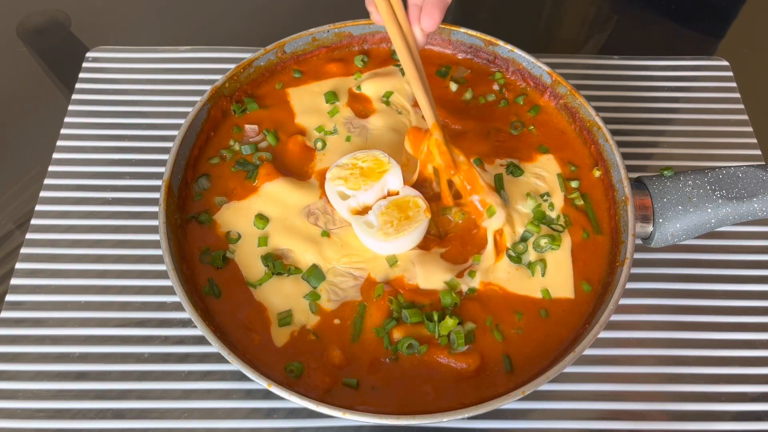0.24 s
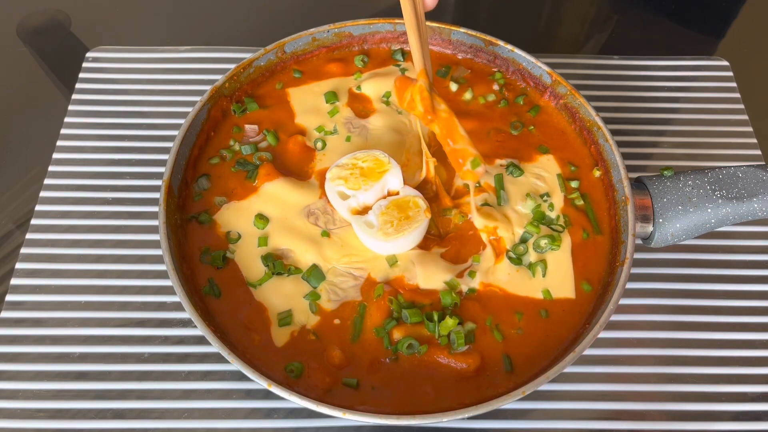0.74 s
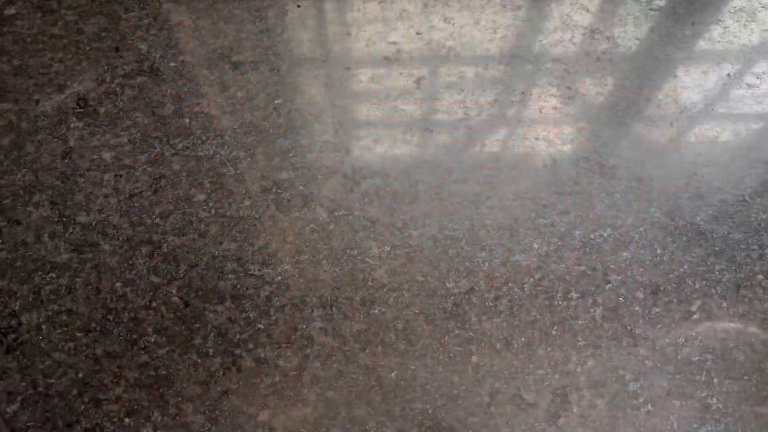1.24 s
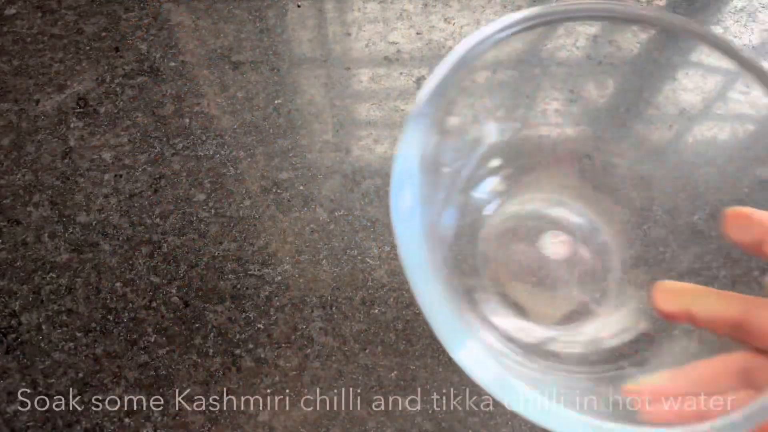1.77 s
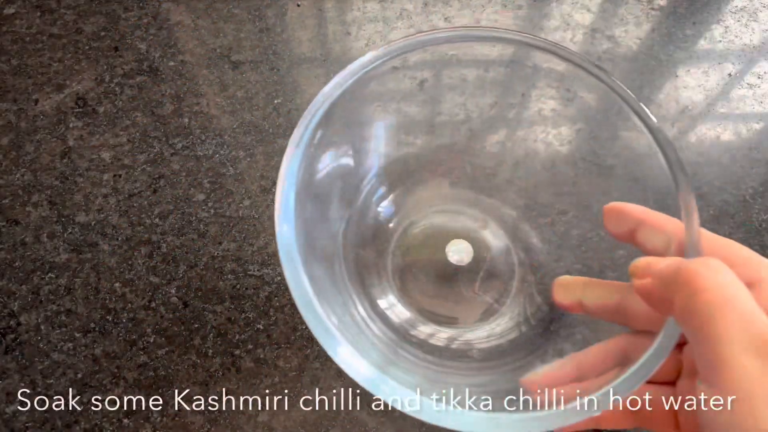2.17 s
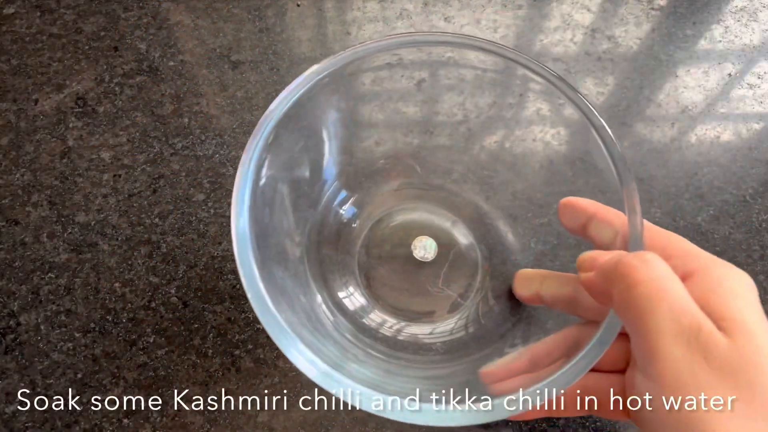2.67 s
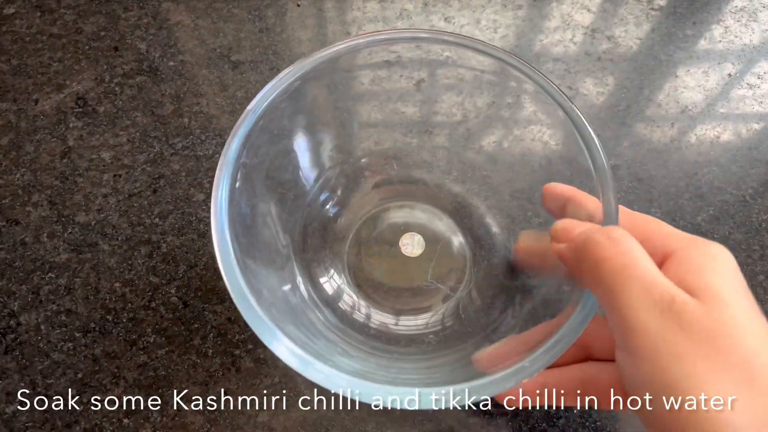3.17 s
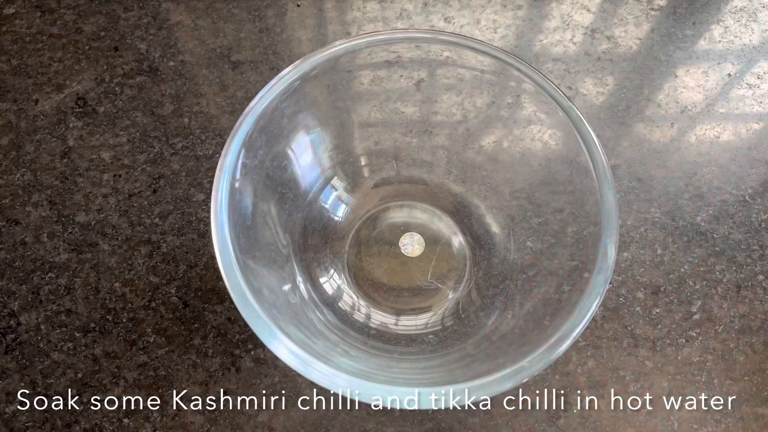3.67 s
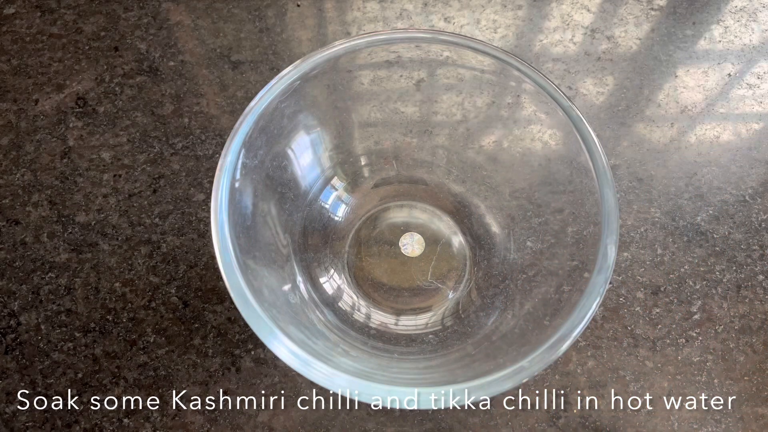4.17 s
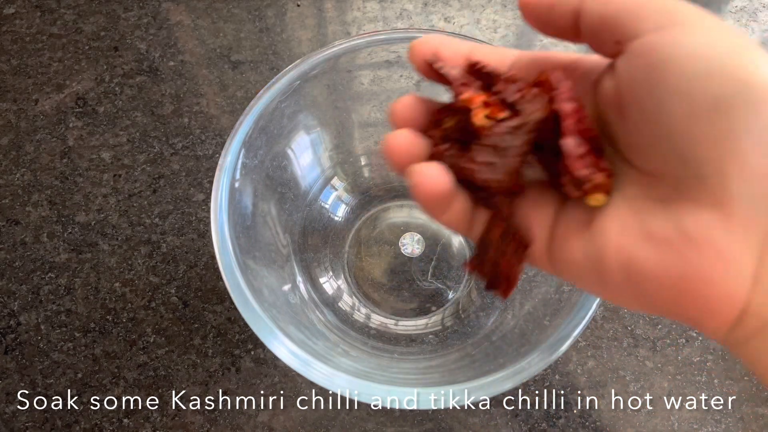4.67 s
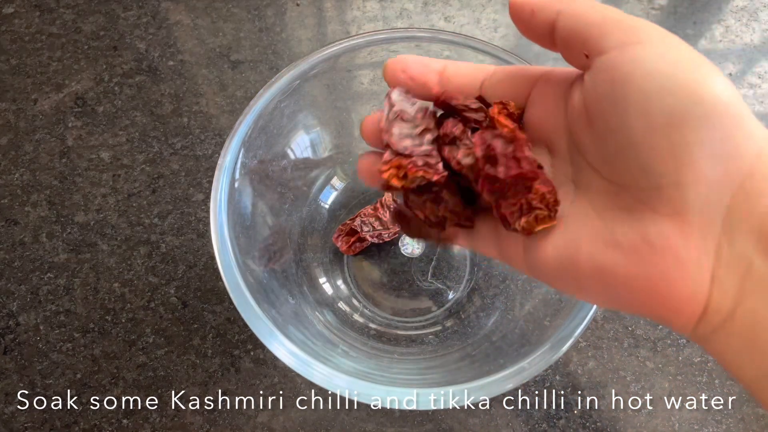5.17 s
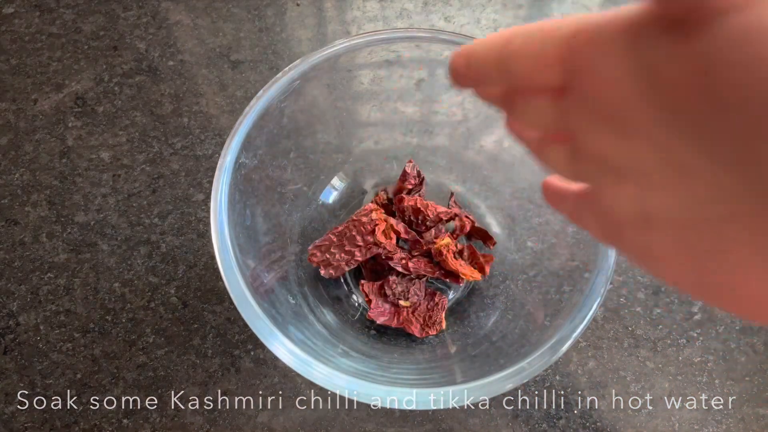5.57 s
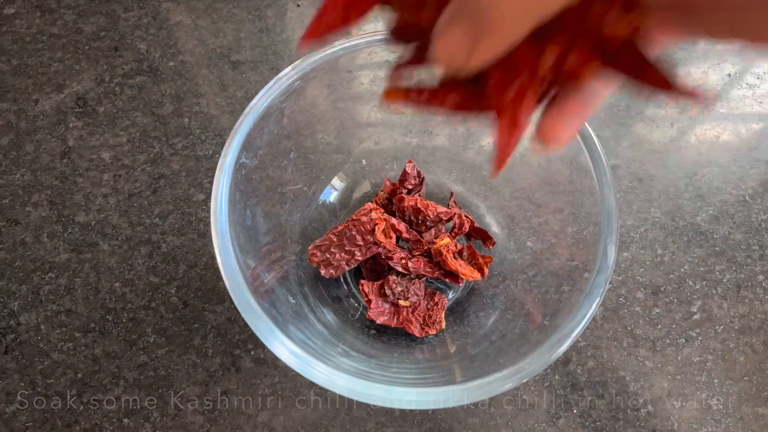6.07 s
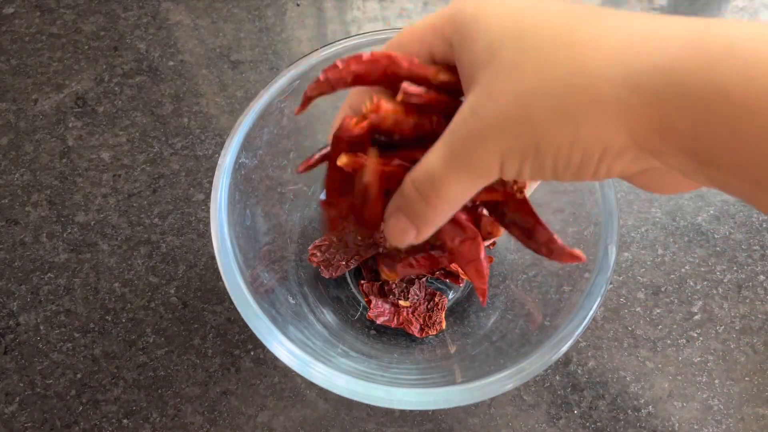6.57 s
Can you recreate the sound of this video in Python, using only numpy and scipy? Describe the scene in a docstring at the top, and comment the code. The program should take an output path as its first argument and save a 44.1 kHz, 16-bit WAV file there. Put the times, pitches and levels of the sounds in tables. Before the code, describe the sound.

Close stereo sound in a small, hard kitchen. A pan simmers faintly with one soft sauce pop, cutting to quiet counter air. A glass bowl lands on stone with a hard knock and duller settling bumps. Dry chillies rustle in a palm, tick singly into the glass, then tumble in a bright crackling clatter. A low hum swells and fades while a second handful crackles in at the end.

```python
"""A small hard kitchen: by the stove a pan simmers faintly, then by the stone counter a glass bowl is set down.
The bowl is struck modes, a knock and grit. Dried chillies rustle in a hand as clouds of tiny snaps,
tick into the bowl as hollow shells with cracking skins, then tumble in; a second handful crackles at the end.
Something knocks further off, a low two-tone hum swells and fades, and thin whines come and go.
Two close microphone ports hear it all, over coloured noise for the air."""
import sys
import numpy as np
from scipy import signal
from scipy.fft import rfft, irfft, next_fast_len
from scipy.io import wavfile
from scipy.ndimage import map_coordinates

SR = 44100
rng = np.random.default_rng(int(sys.argv[2]) if len(sys.argv) > 2 else 0)


def bounce(signal):
    """Save signal as a 16-bit WAV file at the path given by the first command-line argument."""
    frames = np.transpose(np.atleast_2d(signal))
    limited = np.clip(frames, -1, 1)
    pcm = np.round(limited * 32767).astype(np.int16)
    wavfile.write(sys.argv[1], SR, pcm)


N = 300321
TIME = np.arange(N) / SR
AGE = TIME[:SR // 2]  # seconds since a blow
TOP_HZ = 16100  # upper band limit of the sound

# brief dips of the level; the first ends the stove's air, the last lets the hum in: time_s, half_width_s
LEVEL_DIPS = [(1.082, 0.031), (3.437, 0.019), (5.773, 0.0062)]


def amp(db):
    """Decibels to gain."""
    return 10 ** (np.asarray(db) / 20)


def unit(x):
    """Scale to rms 1."""
    return x / np.sqrt(np.mean(x ** 2) + 1e-20)


def unit_attack(x, size=130):
    """Scale a blow so that its first milliseconds have rms 1."""
    return x / np.sqrt(np.mean(x[..., :size] ** 2) + 1e-20)


def along(points, hz):
    """Read (Hz, value) points on a log frequency axis."""
    point_hz, value = np.transpose(points)
    return np.interp(np.log(hz + 1), np.log(point_hz + 1), value)


def fade(t60, size):
    """Exponential decay over size samples, 60 dB in t60 seconds."""
    return np.exp(-np.log(1000) * AGE[:size] / t60)


def wobble(rate):
    """A smooth random curve, rate knots a second."""
    knots = rng.standard_normal(int(N * rate / SR) + 4)
    return map_coordinates(knots, [TIME * rate])


def add(track, s, sound):
    """Mix a sound in at time s, cut off at the track's end."""
    part = track[:, round(s * SR):][:, :sound.shape[-1]]
    part += sound[..., :part.shape[-1]]


SWELL_DB = 20  # rise and fall over a movement's length
RISE_SHARE = 0.48  # part of that length spent rising


def swells(rows):
    """Gain of movements that each rise to their loudest moment and fall again, straight in dB."""
    power = 0
    for s, db, length in rows:
        before = (s - TIME) / RISE_SHARE
        after = (TIME - s) / (1 - RISE_SHARE)
        away = np.maximum(before, after) / length
        power = power + amp(db - SWELL_DB * away) ** 2
    return np.sqrt(power)


def hump(hz, db_per_octave):
    """(Hz, dB) points of one broad resonance, falling off evenly either side of its pitch."""
    return [(hz * 2. ** octave, -db_per_octave * abs(octave)) for octave in range(-4, 5)]


def colour(pair, spectrum, alike):
    """Give two unrelated signals a causal colour and blend them into left and right."""
    n = pair.shape[-1]
    m = 2 * next_fast_len(n // 2 + 2048)
    hz = np.fft.rfftfreq(m, 1 / SR)
    # folding the cepstrum onto positive time gives the minimum-phase response
    cepstrum = irfft(np.log(amp(along(spectrum, hz))))
    response = np.exp(rfft(2 * cepstrum[:m // 2], m) - cepstrum[0])
    # the mid-to-side blend sets the likeness at each frequency
    turn = np.arccos(np.clip(along(alike, hz), -1, 1)) / 2
    blend = [np.cos(turn), np.sin(turn)]
    mid, side = irfft(rfft(pair, m) * response * blend, m)[:, :n]
    return np.array([mid + side, mid - side])


def burst(spectrum, alike, t60, rise, size=4096):
    """A short crack: decaying noise with a soft onset, coloured."""
    envelope = fade(t60, size) * (1 - np.exp(-AGE[:size] / rise))
    noise = rng.standard_normal((2, size)) * envelope
    return unit_attack(colour(noise, spectrum, alike))


def ring(modes, spread, rise=0.00031, size=len(AGE)):
    """Decaying modes struck at new strengths; the lowest are closest in phase at the two ports."""
    t = AGE[:size]
    waves = 0
    for hz, db, t60 in modes:
        strength = amp(db + rng.normal(0, 1.66))
        phase = spread * min(hz / 800, 1) * rng.normal(size=(2, 1))
        waves = waves + strength * fade(t60, size) * np.sin(2 * np.pi * hz * t + phase)
    return waves * (1 - np.exp(-(t / rise) ** 2))


def paired(modes, split_hz, twin_db=-6):
    """A nearly round bowl has a weaker twin just above each mode, so its ring beats."""
    twins = [(hz + split_hz * (.5 + rng.random()), db + twin_db, t60) for hz, db, t60 in modes]
    return list(modes) + twins


# likeness of left and right in the open air: pitch_hz, likeness (1 same, 0 unrelated, -1 opposite)
AIR_LIKENESS = [(60, 0.95), (180, 0.95), (550, 0.04), (1650, -0.13), (4970, 0.2), (15000, 0.28)]
# how long the kitchen rings: pitch_hz, t60_s
ROOM_DECAY = [(150, 0.31), (700, 0.39), (2000, 0.4), (5000, 0.32), (13000, 0.19)]
# tone of the kitchen's reverberation: pitch_hz, level_db
ROOM_TONE = [(90, 2.5), (280, 7.5), (600, 0.5), (12000, -4.5), (16000, -8.5)]


def room(x, rise=0.00054):
    """The kitchen's diffuse answer: noise that dies away band by band, scaled to unit energy on the left."""
    hz, t, bands = signal.stft(rng.standard_normal((2, SR // 2)), SR, nperseg=256)
    decay = amp(-60 * t / along(ROOM_DECAY, hz)[:, None])
    tail = signal.istft(bands * decay, SR, nperseg=256)[1][:, :len(AGE)]
    tail = colour(tail * (1 - np.exp(-AGE / rise)), ROOM_TONE, AIR_LIKENESS)
    return signal.fftconvolve(x, tail / np.linalg.norm(tail[0]), axes=1)[:, :N]


# rumble by the stove: pitch_hz, level_db
STOVE_RUMBLE = [(20, -23), (45, -1.5), (110, -3.5), (170, -12.5), (265, -7.5), (350, -17.5), (2100, -29),
                (5200, -54.5), (9000, -80)]
# rumble of the air by the counter, with a little hiss around 12.5 kHz: pitch_hz, level_db
COUNTER_RUMBLE = [(22, -25.5), (62, 0), (133, -8), (220, -6.5), (320, -16.5), (1200, -25.5), (1700, -33.5),
                  (4500, -49.5), (8000, -67), (12500, -58), (16000, -80)]
# hiss of the pan: pitch_hz, level_db
SIZZLE_TONE = [(2000, -5.5), (4400, 5), (4720, -3), (4880, 8), (5400, -5.5), (15000, -18.5)]
# a soft brushing hiss: loudest_s, level_db, length_s
BRUSH_MOVES = [(1.31, -69.5, 0.3)]
# bright, brittle noise of the brush, the grit and the pods' dry skins: pitch_hz, level_db
BRITTLE_TONE = [(1200, -33), (3000, -17.5), (6000, -9), (9500, -8.5), (12000, -4), (13700, -11.5),
                (16000, -30)]
SIZZLE_DB, SIZZLE_QUIETS_S, SIZZLE_DROP_DB = -64.5, .43, 14  # the pan hisses, then quietens


def rush(spectrum):
    """Steady coloured noise of rms 1, as from moving air."""
    return unit(colour(rng.standard_normal((2, N)), spectrum, AIR_LIKENESS))


def air():
    """Noise rumble and sizzle by the stove give way to the air by the counter, where something brushes past."""
    by_stove = TIME < LEVEL_DIPS[0][0]
    rumble = amp(-47.5) * np.where(by_stove, rush(STOVE_RUMBLE), rush(COUNTER_RUMBLE))
    quietened = np.clip((TIME - SIZZLE_QUIETS_S) / 0.094 + .5, 0, 1)
    sizzle = by_stove * amp(SIZZLE_DB - SIZZLE_DROP_DB * quietened) * rush(SIZZLE_TONE)
    brush = swells(BRUSH_MOVES) * rush(BRITTLE_TONE)
    return rumble + sizzle + brush


# thin, faint whines in the background: start_s, end_s, pitch_hz, level_db
WHINE_TONES = [(0, 1.08, 738, -66.5), (0, 1.08, 2213, -74.5), (1.103, 1.72, 3880, -82),
               (2.12, 3.447, 2536, -83), (3.36, 3.453, 3080, -71), (3.365, 3.433, 3510, -74)]


def whines():
    """Narrow tones, unsteady in pitch and level, that come and go."""
    out = np.zeros((2, N))
    for start, end, hz, db in WHINE_TONES:
        gate = np.clip(np.minimum(TIME - start, end - TIME) / 0.037, 0, 1)
        phase = 2 * np.pi * np.cumsum(hz * (1 + 0.0063 * wobble(90))) / SR
        level = amp(db + 2.5 * wobble(25))
        out += level * gate * np.sin(phase + rng.normal(size=(2, 1)))
    return out


# thick sauce pops in the pan: start_s, level_db, pitch_hz
SAUCE_POPS = [(.845, -52, 1130), (.927, -69, 4200)]


def plops():
    """Bubbles burst softly in the simmering pan, each a noise crack around its own pitch."""
    out = np.zeros((2, N))
    for s, db, hz in SAUCE_POPS:
        pop = burst(hump(hz, db_per_octave=21), AIR_LIKENESS, t60=0.04, rise=0.00092)
        add(out, s, amp(db) * pop)
    return out


# the bowl meets the counter: start_s, level_db, contact_cutoff_hz, glass_ring_db, room_db
BOWL_CONTACTS = [(2.8652, -16, 6900, -47.5, -10), (3.017, -32.5, 1000, -53, -5),
                 (3.0226, -18.5, 613, -51.5, -17), (3.039, -15.5, 243, -73, -23),
                 (3.128, -46.5, 905, -53.5, -4)]
# noise of bowl on stone: pitch_hz, level_db
STONE_KNOCK = [(50, -45), (130, -12.5), (300, -0.5), (550, -1), (900, 3), (1600, -4), (2700, -9.5),
               (3700, -23.5), (8500, -54)]
# the bowl on its base: pitch_hz, level_db, t60_s
BOWL_BODY = [(178.4, -22.5, 0.22), (250, -16, 0.22), (377.5, -18, 0.17), (788, -13, .13), (869, -7, 0.13),
             (987, -15, 0.13), (1230, -16, 0.15), (2455, -21, 0.11)]
# thick glass wall: pitch_hz, level_db, t60_s
GLASS_WALL = [(8400, -14, 0.14), (10555, -3, 0.17), (12430, -13, 0.26), (14700, -27, .3)]
# the stone's dead clack: pitch_hz, level_db, t60_s
STONE_CLACK = [(469, 2.5, .022), (933, 6.5, 0.021), (1286, 0, .022), (2070, -3, 0.025), (2540, -2.5, 0.019)]
GRIT_DB, GRIT_T60_S = -20, 0.16  # grit under the glass, against its ring


def bowl():
    """Stone and glass modes: a hard, bright first contact, then duller bumps as the bowl settles."""
    out = np.zeros((2, N))
    for s, db, cutoff_hz, ring_db, room_db in BOWL_CONTACTS:
        knock = ring(STONE_CLACK, spread=0.33, rise=0.00066) + ring(BOWL_BODY, spread=0.96)
        # the counter and the near wall throw the blow straight back
        thrown_back = burst(STONE_KNOCK, AIR_LIKENESS, t60=0.097, rise=0.00062)
        add(knock, .004, amp(-7.5) * thrown_back)
        # a softer contact lasts longer and so lacks the treble
        softness = signal.butter(3, cutoff_hz, fs=SR, output="sos")
        knock = amp(db) * signal.sosfilt(softness, knock)
        add(out, s, knock)
        add(out, s, amp(room_db) * room(knock))
        glass = ring(paired(GLASS_WALL, split_hz=18.5), spread=1.0)
        add(out, s, amp(ring_db) * glass)
        grit = burst(BRITTLE_TONE, AIR_LIKENESS, t60=GRIT_T60_S, rise=0.000304)
        add(out, s, amp(ring_db + GRIT_DB) * grit)
    return out


# likeness of left and right for the pods: pitch_hz, likeness (1 same, 0 unrelated, -1 opposite)
POD_LIKENESS = [(1500, 0.93), (3500, 0.85), (7500, -0.42), (12000, 0.42)]
SNAP_SPREAD_DB = 5  # how unequal the snaps are


def crackle(moves, start_s, end_s, rest_db, spectrum, rate, clump_db, wet_db, size=96):
    """Dry skins catch and slip: tiny snaps of random pitch, a few far louder than the rest."""
    length_s = end_s - start_s
    when, pitch, strength, phase = rng.random((int(rate * length_s), 4)).T[:, :, None]
    t = AGE[:size]
    snap = amp(-SNAP_SPREAD_DB * np.log(np.maximum(strength, .02))) * fade(.002, size)
    index = ((start_s + when * length_s) * SR).astype(int) + np.arange(size)
    pair = []
    for turn in (0, np.pi / 2):  # a quarter turn apart, to blend into left and right
        wave = snap * np.sin(2 * np.pi * (pitch * TOP_HZ * t + phase) + turn)
        pair.append(np.bincount(index.ravel(), wave.ravel(), N)[:N])
    # rms 1 over the stretch that crackles
    snaps = unit(colour(np.array(pair), spectrum, POD_LIKENESS)) * np.sqrt(length_s * SR / N)
    # between movements the pods barely creak
    effort = np.hypot(swells(moves), amp(rest_db))
    # snaps come in clumps as whole pods shift
    dry = snaps * effort * amp(clump_db * wobble(260))
    return dry + amp(wet_db) * room(dry)


# pods stirring in the palm: loudest_s, level_db, length_s
PALM_MOVES = [(3.745, -51.5, 0.072), (3.81, -55.5, 0.4), (4.135, -51.5, 0.27), (4.7, -57.5, 1),
              (5.16, -46, 0.25)]
# crackle of the pods in the palm: pitch_hz, level_db
PALM_TONE = [(500, -3.5), (1200, -3), (3000, 2), (6000, 0.5), (11500, -5.5), (13800, -2), (15500, -41)]
# the palm tips them into the bowl, and they settle: loudest_s, level_db, length_s
TUMBLE_MOVES = [(5.306, -26.5, 0.098), (5.385, -24.5, 0.23), (5.53, -41, 0.14)]
# crackle of the tumbling pods: pitch_hz, level_db
TUMBLE_TONE = [(250, -26), (800, -17), (1450, -18), (2000, -10.5), (3200, -6.5), (7000, -1), (13500, -3),
               (16000, -32)]
# a second handful is gripped and pushed in: loudest_s, level_db, length_s
HANDFUL_MOVES = [(5.81, -59, 0.8), (5.985, -51.5, 0.11), (6.291, -55.5, 0.11), (6.61, -44.5, 0.18),
                 (6.691, -38.5, 0.14), (6.8, -34.5, 0.42)]
# crackle of the second handful: pitch_hz, level_db
HANDFUL_TONE = [(250, -21), (550, -6), (900, 0), (1400, -10.5), (1850, -3.5), (2700, -5.5), (11600, -4.5),
                (14100, -7), (15800, -55)]


def chillies():
    """Snapping skins: pods slide in the palm, tumble into the bowl in a dense crackle, and more follow."""
    held = crackle(PALM_MOVES, start_s=3.45, end_s=5.23, rest_db=-80, spectrum=PALM_TONE,
                   rate=9000, clump_db=1.2, wet_db=-2.0)
    tumble = crackle(TUMBLE_MOVES, start_s=5.23, end_s=5.77, rest_db=-65, spectrum=TUMBLE_TONE,
                     rate=6000, clump_db=2.5, wet_db=-6.5)
    handful = crackle(HANDFUL_MOVES, start_s=5.79, end_s=6.81, rest_db=-66, spectrum=HANDFUL_TONE,
                      rate=9000, clump_db=2.2, wet_db=-2.5)
    return held + tumble + handful


# the double knock further off: start_s, level_db
FAR_BLOWS = [(3.787, -40), (3.798, -40)]
# its muffled tone: pitch_hz, level_db
FAR_TONE = [(300, -29), (900, -12), (1350, -6), (2200, -12.5), (3800, -17), (7500, -47)]


def far_knock():
    """A light double knock across the kitchen, mostly reverberation."""
    out = np.zeros((2, N))
    for s, db in FAR_BLOWS:
        add(out, s, amp(db) * burst(FAR_TONE, AIR_LIKENESS, t60=0.027, rise=0.0013))
    return out + amp(3.0) * room(out)


# dry pods hit the glass or snap: start_s, level_db, shell_pitch_hz
POD_TICKS = [(4.302, -36.5, 11050), (4.543, -38, 5260), (4.617, -28, 3930), (4.6325, -32.5, 3900),
             (4.7032, -23.5, 3590), (4.7582, -20, 6500), (4.765, -17.5, 6200), (4.768, -18, 5770),
             (4.826, -24, 5470), (4.8478, -34, 3450), (4.9083, -35.5, 3160), (4.933, -36.5, 5440),
             (4.9422, -42, 5400), (5.1189, -25.5, 3160), (5.2303, -5, 3840), (5.272, -22, 3530),
             (5.2876, -15.5, 6380), (5.3, -16, 6130), (5.304, -18.5, 3350), (5.3258, -16, 3650),
             (5.347, -13, 5250), (5.3552, -6, 3210), (5.3664, -7.5, 4070), (5.4365, -12, 5220),
             (5.4615, -23.5, 3110), (5.4992, -23, 7100), (5.547, -29, 5570), (5.793, -43, 2090),
             (5.9566, -32, 6880), (6.013, -35, 1820), (6.341, -38.5, 1590), (6.463, -40.5, 3550),
             (6.5265, -37.5, 1790), (6.655, -32, 1900), (6.6615, -19.5, 1810), (6.7005, -24, 1950),
             (6.723, -22, 4300), (6.774, -29, 1790)]
REBOUND_S, REBOUND_DB = .033, -17.5  # a pod's hop after a tick: typical flight time, loss
STRENGTH_SPREAD_DB = 4.5  # scatter of hops and bumps, either way


def rebounds():
    """Rows like those of POD_TICKS: each pod touches again, more faintly and at another pitch."""
    rows = []
    for (s, db, hz), (when, force, pitch) in zip(POD_TICKS, rng.random((len(POD_TICKS), 3))):
        hop_db = db + REBOUND_DB + STRENGTH_SPREAD_DB * (2 * force - 1)
        rows.append((s + REBOUND_S * (.5 + when), hop_db, hz * 2 ** (pitch - .5)))
    return rows


# pods bump one another: start_s, end_s, level_over_crackle_db, shell_pitch_hz
POD_BUMPS = [(5.29, 5.581, 4, 3910), (5.85, 6.813, 2.5, 2200)]
BUMPS_PER_S = 55


def jostles():
    """Rows like those of POD_TICKS: pods bump in quick, uneven succession, as hard as the movement is strong."""
    effort_db = 20 * np.log10(swells(list(TUMBLE_MOVES) + list(HANDFUL_MOVES)) + 1e-20)
    rows = []
    for start, end, db, shell_hz in POD_BUMPS:
        slots = np.arange(start, end, 1 / BUMPS_PER_S)
        for s, (when, force, pitch) in zip(slots, rng.uniform(-1, 1, (len(slots), 3))):
            strength_db = np.interp(s, TIME, effort_db) + db + STRENGTH_SPREAD_DB * force
            rows.append((s + when / 2 / BUMPS_PER_S, strength_db, shell_hz * 2 ** pitch))
    return rows


# the bowl's answer to a tick: pitch_hz, level_db, t60_s
BOWL_ANSWER = [(2610, -3.5, .13), (3033, -2, 0.095), (3090, -2, 0.082), (4080, -1, .06), (3880, 1.5, 0.081),
               (5175, -6, .1), (5370, -4, 0.11)]
SHELL_DB_PER_OCTAVE = 15  # how fast a tick's hollow noise falls off either side of its pitch
SECOND_CONTACT_S = 0.0029  # a pod lands on one end, then the other
ECHO_S, ECHO_DB = .0103, -15.5  # a near wall answers


def ticks(size=1024):
    """Each pod sounds its hollow shell, cracks its brittle skin twice, and wakes bowl modes near its pitch."""
    out = np.zeros((2, N))
    for s, db, shell_hz in list(POD_TICKS) + rebounds() + jostles():
        shell_modes = [(shell_hz, 0, .015), (shell_hz * 0.882, -4, .012)]
        tick = amp(-14.0) * unit_attack(ring(shell_modes, spread=0.69, rise=0.00053, size=size))
        hollow = burst(hump(shell_hz, SHELL_DB_PER_OCTAVE), POD_LIKENESS, t60=0.017, rise=0.00063, size=size)
        add(tick, 0, amp(-14.0) * hollow)
        first_crack = burst(BRITTLE_TONE, POD_LIKENESS, t60=0.0032, rise=0.00017, size=size)
        add(tick, .0005, amp(-13.0) * first_crack)
        second_crack = burst(BRITTLE_TONE, POD_LIKENESS, t60=0.0048, rise=0.00022, size=size)
        add(tick, SECOND_CONTACT_S, amp(-13) * second_crack)
        add(out, s, amp(db) * tick)
    answer = ring(BOWL_ANSWER, spread=0.34, rise=0.0016)
    answer = answer / np.linalg.norm(answer[0])
    out += amp(-18.5) * signal.fftconvolve(out, answer, axes=1)[:, :N]
    wet = amp(-11.0) * room(out, rise=0.00089)
    add(wet, ECHO_S, amp(ECHO_DB) * out)
    return out + wet


# pods land squarely on the glass: start_s, rim_ring_db, thud_db
SQUARE_LANDINGS = [(4.765, -62.5, -55), (5.357, -57, -45.5)]
# the bowl's rim sings: pitch_hz, level_db, t60_s
RIM_MODES = [(1060, -2, 1), (2440, 5, 0.77)]


def landings():
    """A pod that lands squarely sets the rim's modes singing and nudges the bowl on the counter."""
    out = np.zeros((2, N))
    for s, ring_db, thud_db in SQUARE_LANDINGS:
        add(out, s, amp(ring_db) * ring(paired(RIM_MODES, split_hz=5.1), spread=.5))
        add(out, s, amp(thud_db) * ring(STONE_CLACK, spread=0.63))
    return out


# how far the pods lean to the left: pitch_hz, left_over_right_db
POD_LEAN = [(1500, 1), (2800, 3.5), (7000, 1.5)]


def lean(x):
    """The pods reach the left port more strongly, above all in their hollow middle range."""
    m = next_fast_len(N + 2048)
    balance_db = along(POD_LEAN, np.fft.rfftfreq(m, 1 / SR))
    gains = amp(np.array([balance_db, -balance_db]) / 2)
    return irfft(rfft(x, m) * gains, m)[:, :N]


# low tones that swell and fade, upper then lower: pitch_hz, loudest_s, level_db, length_s
HUM_TONES = [(212, 6.14, -36.5, 1.12), (168.6, 6.35, -47, 2.2)]


def hum():
    """Two low, wavering tones set in late, swell and fade, with a faint third at their sum."""
    upper, lower = [swells([row[1:]]) * (TIME > LEVEL_DIPS[-1][0]) for row in HUM_TONES]
    upper_phase = 2 * np.pi * np.cumsum(HUM_TONES[0][0] + 0.58 * wobble(5.04)) / SR
    lower_phase = 2 * np.pi * np.cumsum(HUM_TONES[1][0] + 1.504 * wobble(5)) / SR
    sum_tone = amp(-20.5) * np.sin(upper_phase + lower_phase)
    return upper * (np.sin(upper_phase) + sum_tone) + lower * np.sin(lower_phase)


def scene():
    """All sources together; the level dips briefly three times."""
    pods = lean(ticks() + chillies() + landings())
    mix = air() + whines() + plops() + bowl() + pods + far_knock() + hum()
    for s, half_width in LEVEL_DIPS:
        mix = mix * (1 - amp(-.5) * np.exp(-((TIME - s) / half_width) ** 2))
    return mix


def record(dry, notch_hz=8300, width_hz=700, notch_db=-13):
    """The whole sound is dull in one narrow treble band near 8.3 kHz and ends steeply above 16 kHz."""
    m = next_fast_len(N + SR // 2)
    hz = np.fft.rfftfreq(m, 1 / SR)
    notch = amp(notch_db * np.exp(-((hz - notch_hz) / width_hz) ** 2))
    band_limit = 1 / (1 + (hz / TOP_HZ) ** 150)
    return irfft(rfft(dry, m) * notch * band_limit, m)[:, :N]


dry = scene()
out = record(dry)
bounce(out)
```